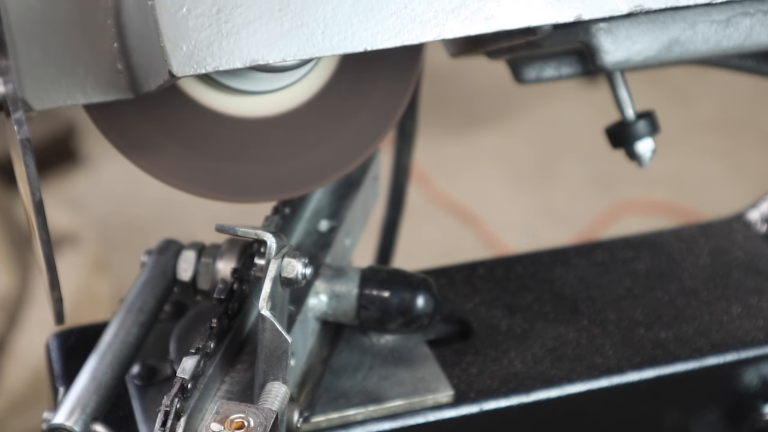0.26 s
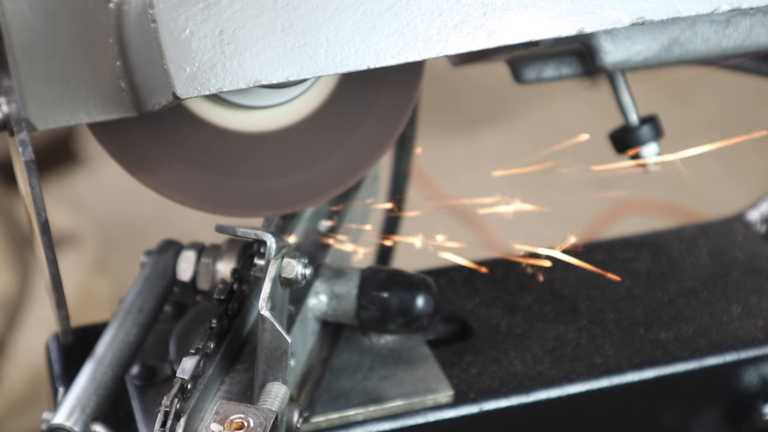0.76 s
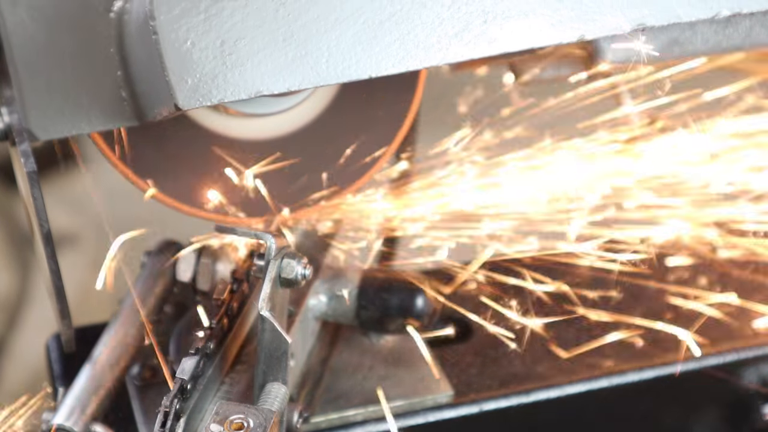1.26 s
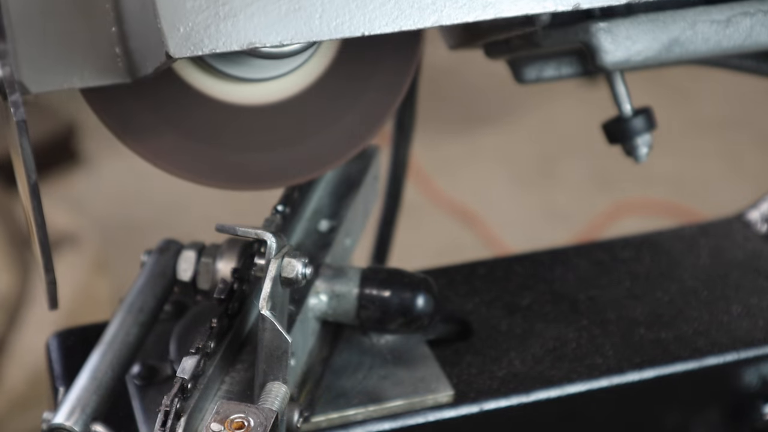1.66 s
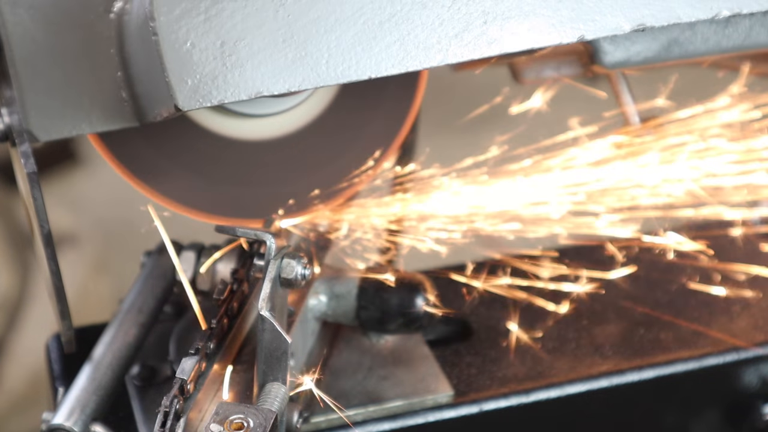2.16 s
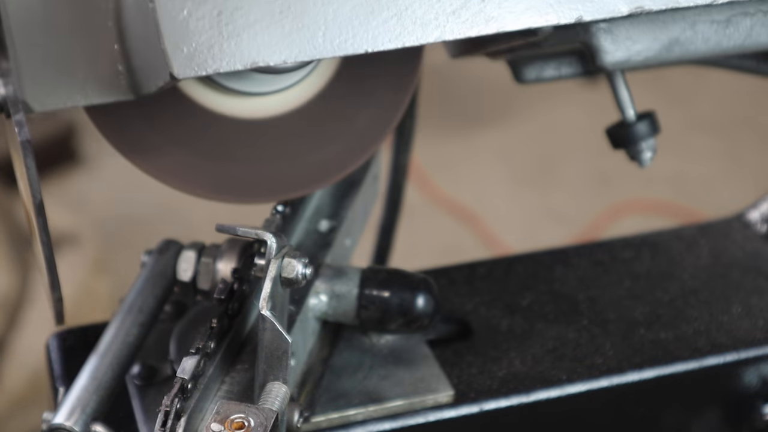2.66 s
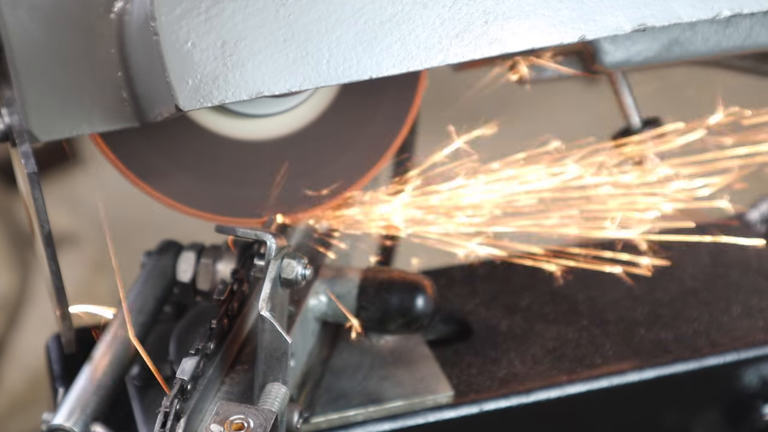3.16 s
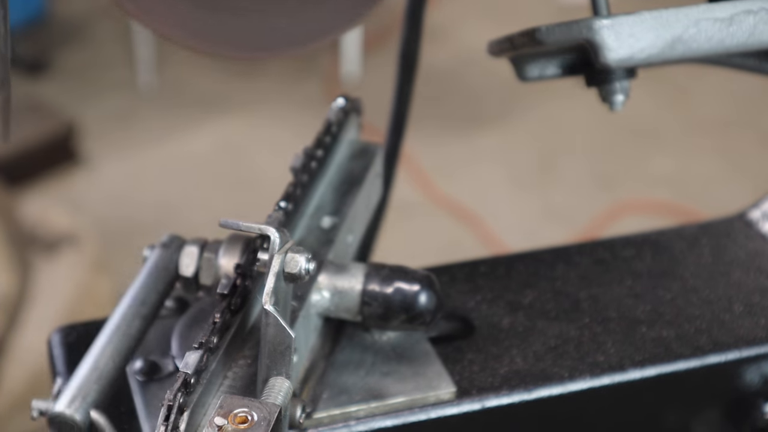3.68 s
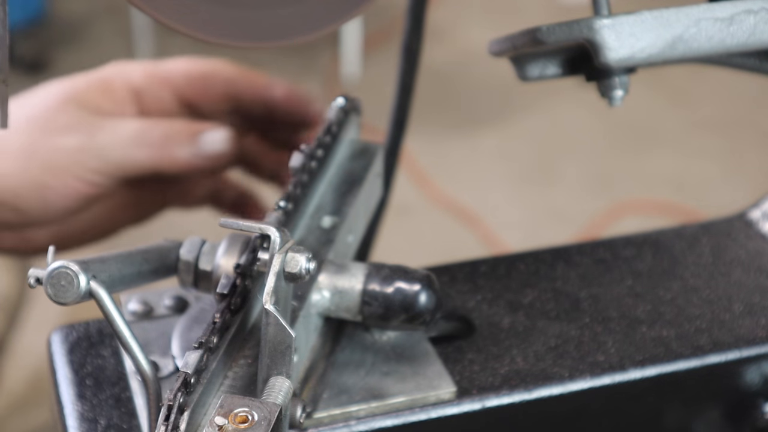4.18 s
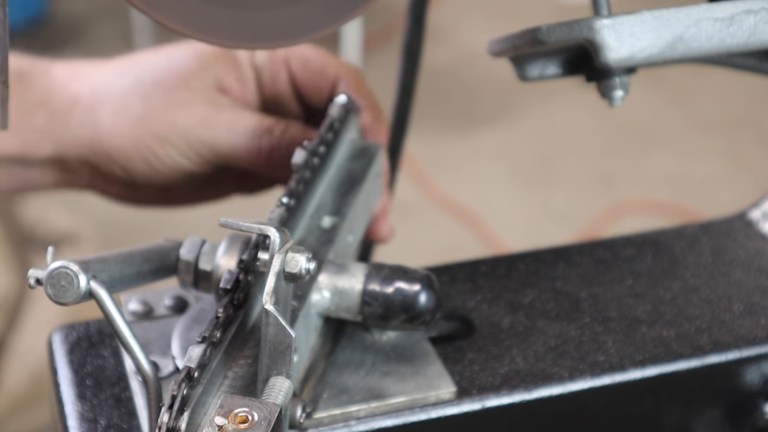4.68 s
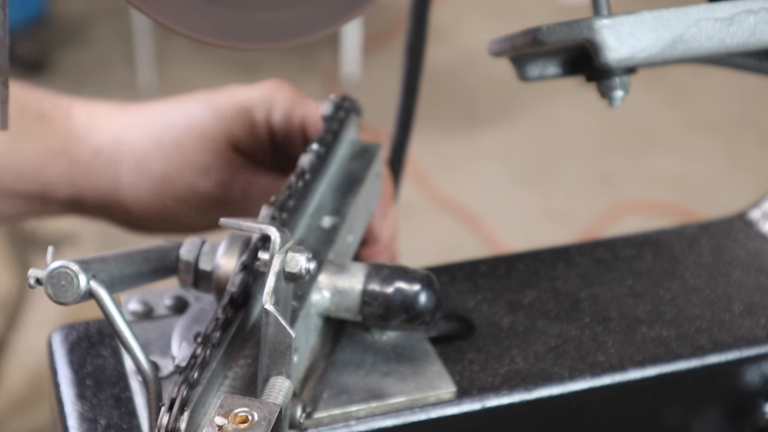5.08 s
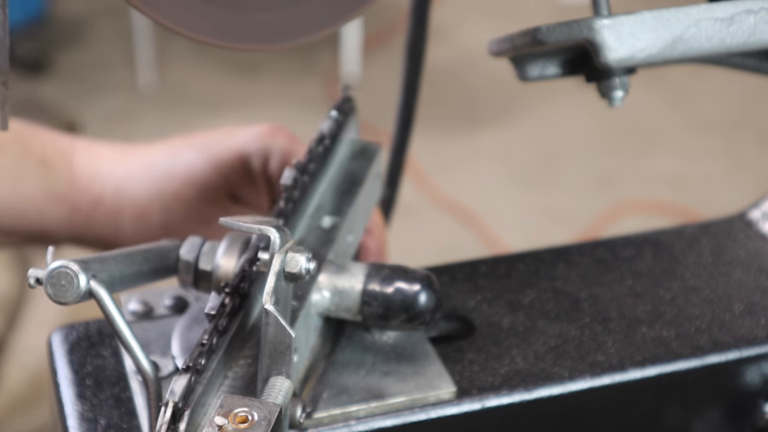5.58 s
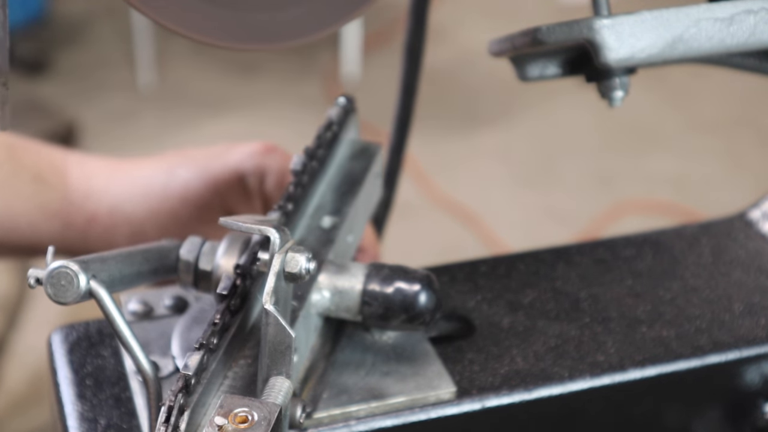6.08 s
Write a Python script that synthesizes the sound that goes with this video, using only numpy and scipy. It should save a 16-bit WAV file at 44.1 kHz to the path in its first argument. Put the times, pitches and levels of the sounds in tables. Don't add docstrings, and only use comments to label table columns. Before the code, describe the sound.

Close in a workshop, a steady throbbing electric grinder hum, broken early by three short gritty metal screeches, then only the motor running on.

```python
import sys
import numpy as np
from scipy import signal
from scipy.io import wavfile
from scipy.ndimage import uniform_filter1d

SR = 44100
rng = np.random.default_rng(int(sys.argv[2]) if len(sys.argv) > 2 else 0)


def bounce(signal):
    frames = np.transpose(np.atleast_2d(signal))
    limited = np.clip(frames, -1, 1)
    pcm = np.round(limited * 32767).astype(np.int16)
    wavfile.write(sys.argv[1], SR, pcm)


def boost_factor(decibels):
    exponent = np.asarray(decibels, float) / 20
    return 10 ** exponent


N = 279594
T = np.arange(N) / SR
HZ = np.fft.rfftfreq(8192, 1 / SR)

BELT, CAGE, BEAT, WHEEL = 11 / 56, 1 / 6, .0363, .4113
IDLE_DOWN, IDLE_UP = 133.4, 133.5

# time in seconds, how far raised [0-1].
HEAD_LIFT = [
    (0, 0),
    (1.25, 0),
    (1.7, .4),
    (2.3, .4),
    (3.1, .6),
    (3.45, .6),
    (3.9, 1),
    (6.34, 1),
]
# time in seconds, level of the grit in dB.
BITES = [
    [(.72, -55), (.76, -42), (.96, -41.5), (1.08, -33), (1.25, -32.5), (1.295, -27.5), (1.34, -28),
     (1.49, -39), (1.54, -53)],
    [(2.17, -53), (2.205, -27.5), (2.24, -31.5), (2.28, -35), (2.35, -33), (2.51, -39.5), (2.6, -56)],
    [(3.1, -53), (3.14, -36.5), (3.3, -36), (3.4, -37), (3.46, -43), (3.52, -54)],
]


def motor(turns, slowed):
    shares_db = -3.4, -10.3, -6.6
    # multiple of the shaft rate, level in dB.
    orders_down = [(1, -41), (2, -35), (3, -25), (4, -16), (5, -9), (6, -25), (7, -16), (8, -13), (9, -15),
                   (10, 0), (11, -4.5), (12, -17), (13, -21), (14, -29), (15, -19), (16, -23), (17, -23),
                   (18, -19)]
    # multiple of the shaft rate, level in dB.
    orders_up = [(1, -40), (2, -38), (3, -25), (4, -15), (5, -14), (6, -21), (7, -6.5), (8, -11.5),
                 (9, -13), (10, 0), (11, -5.5), (12, -24), (13, -16), (14, -30), (15, -22), (16, -18),
                 (17, -25), (18, -26)]
    # time in seconds, level in dB.
    wander = [(0, -15.5), (.25, -13.5), (.6, -15), (1.2, -13), (1.5, -15), (3.1, -14), (3.52, -15),
              (3.75, -13.5), (5.2, -12.5), (6.34, -13.5)]
    pattern = strength(turns + 1 / 2, slowed)
    blow = knocks(turns)
    loose = rattle(turns, pattern)
    heads = []
    for raised, orders in ((False, orders_down), (True, orders_up)):
        comb = 0
        for k, db in orders:
            drive_gain = boost_factor(db) / np.sqrt(casting_power(k * 133.5, raised))
            comb = comb + drive_gain * np.cos(2 * np.pi * k * turns)
        drives = comb * (1 + 0.12 * pattern), blow * pattern, loose
        casting = casting_power(HZ, raised)
        heads.append(sum(boost_factor(db) * evened(colour(drive, casting)) for db, drive in zip(shares_db, drives)))
    raised = np.clip(curve(HEAD_LIFT), 0, 1)
    head = (1 - raised) * heads[0] + raised * heads[1]
    return boost_factor(curve(wander)) * (head + strained_arm(blow, slowed) + fan() + hum())


def knocks(turns):
    soft = 16.0
    return sum(np.cos(2 * np.pi * k * turns) / np.hypot(1, (k / soft) ** 2) for k in range(4, 30))


def strength(turns, slowed):
    throb = [(BELT, .23, -.08), (2 * BELT, .13, -.14), (CAGE, .24, .49), (2 * CAGE, .07, .3),
             (BEAT, .12, .36), (WHEEL, .14, -.15), (WHEEL - BELT, .06, -.2), (WHEEL - CAGE, .06, .37),
             (CAGE + BEAT, .06, .4)]
    depth_down, depth_up = 1.5, .75
    damped = .2
    turn = np.floor(turns)
    pattern = sum(share * np.cos(2 * np.pi * (ratio * turn + start)) for ratio, share, start in throb)
    depth = depth_down + (depth_up - depth_down) * curve(HEAD_LIFT)
    depth = depth * (1 - damped * np.minimum(slowed, 2))
    return depth * uniform_filter1d(pattern, size=40)


def rattle(turns, pattern):
    slap = (turns - .5) % 1
    burst = 1 + np.exp(-slap / 0.1)
    gate = np.maximum(1 + 0.23 * pattern, .1)
    return rng.standard_normal(N) * burst * gate * boost_factor(drift(41))


def casting_power(hz, raised):
    # frequency in Hz, width in Hz, level in dB head down, in dB head up.
    body_modes = [(116, 20, -55, -59), (363, 36, -43.5, -36), (567.5, 22.3, -14.5, -14.5),
                  (601, 22.6, -12.5, -13.5), (646.7, 58, -16, -19), (897, 74, -21, -17),
                  (1008, 102, -20, -16), (1111, 61, -17.5, -18), (1223, 165, -16.5, -15),
                  (1314, 47.6, -4, -9), (1411.4, 54, -8.5, -6), (1446, 46, -6.5, -11), (1574, 53, -18, -20),
                  (1721, 27, -17, -19), (1958, 53, -16, -18), (2114, 67, -23.5, -18.5),
                  (2386, 186, -20, -21.5), (3002, 88, -19, -21.5), (3305, 180, -33, -28.5),
                  (4080, 160, -20, -23.5), (4560, 470, -26, -26.5), (5340, 70, -28.5, -29),
                  (6000, 240, -37, -41.5), (6940, 100, -84, -49), (7640, 110, -36, -40),
                  (8230, 510, -40, -43.5), (9160, 740, -39, -47), (11500, 410, -44, -46.5),
                  (12600, 400, -46, -65), (14700, 300, -58, -64)]
    # frequency in Hz, level in dB.
    floor = [(25, -91), (300, -58), (750, -51), (1800, -27.5), (2700, -31), (5000, -35.5), (6600, -46),
             (10000, -47.5), (13000, -53.5), (13600, -60), (15600, -64)]
    column = 3 if raised else 2
    modes = [(mode[0], mode[1], mode[column]) for mode in body_modes]
    return modes_power(modes, hz) + boost_factor(read(floor, hz)) ** 2


def strained_arm(blow, slowed):
    # frequency in Hz, width in Hz, level in dB.
    arm_modes = [(265, 20, -3.5), (579, 61, 4.5), (895, 80, 0.5), (1080, 170, 0), (1250, 210, 3.5),
                 (1720, 210, -5)]
    load = np.sqrt(np.clip(2 * slowed, 0, 2))
    rough_blow = evened(blow) * (1 + .6 * drift(40))
    strain = load * (rough_blow + 2.2 * rng.standard_normal(N))
    return boost_factor(-17) * evened(colour(strain, modes_power(arm_modes, HZ)))


def grinding(turns):
    # frequency in Hz, level in dB per Hz.
    grit = [(1180, -33), (2000, 2.5), (2770, -7), (2940, -1.5), (4250, -4.5), (4880, -6), (5270, -7),
            (10800, -17.5), (15500, -32)]
    # frequency in Hz, width in Hz, level in dB.
    chain_modes = [(2407, 23, -8), (3146, 41, 2), (3170, 36, 1), (4035, 230, 4), (4460, 170, 6),
                   (5320, 170, -4.5), (5940, 210, -24), (6410, 200, -12), (7620, 260, -21),
                   (8620, 370, -13), (9300, 300, -13), (10500, 500, -15), (11600, 290, -12)]
    wobble_db, chatter_db = 3, 2.0
    hiss_db, ring_db = 6, 2
    grains = rng.standard_normal(N) * boost_factor(2.5 * np.minimum(rng.exponential(1, N), 4))
    grains *= boost_factor(wobble_db * np.cos(2 * np.pi * WHEEL * turns))
    low_cut = (HZ / (HZ + 900)) ** 4
    hiss = colour(grains, boost_factor(read(grit, HZ)) ** 2 * low_cut)
    ring = 0
    for mode in chain_modes:
        chatter = boost_factor(chatter_db * drift(17))
        ring = ring + colour(grains * chatter, modes_power([mode], HZ))
    contact = sum(map(pressure, BITES))
    return contact * (boost_factor(hiss_db) * evened(hiss) + boost_factor(ring_db) * evened(ring))


def pressure(bite):
    return boost_factor(curve(bite)) * (T > bite[0][0]) * (T < bite[-1][0])


def sag():
    turns_lost = 1.42, .73, .32
    grip_db, inertia_s, drag_power = -44, .04, 1.2
    hold = np.exp(-1 / (inertia_s * SR))
    slowed = 0
    for lost, bite in zip(turns_lost, BITES):
        grip = np.maximum(pressure(bite) - boost_factor(grip_db), 0) ** drag_power
        drag = signal.lfilter([1 - hold], [1, -hold], grip)
        slowed = slowed + lost * SR * drag / (drag.sum() + 1e-9)
    return slowed


def fan():
    # frequency in Hz, level in dB.
    air_colour = [(25, -16), (70, -10), (200, -2), (330, -0.5), (480, 1.5), (750, 1), (1200, -20),
                  (20000, -55)]
    air = rng.standard_normal(N)
    return boost_factor(-27) * evened(colour(air, boost_factor(read(air_colour, HZ)) ** 2))


def hum():
    return boost_factor(-43.5) * np.sin(2 * np.pi * 120 * T)


def shop(x):
    t60, wet_db = 0.074, -9
    taps = np.zeros(SR // 2)
    at = np.arange(400, len(taps) - 20, 20)
    taps[at + rng.integers(0, 20, len(at))] = rng.choice([-1., 1.], len(at))
    taps *= boost_factor(-60 * T[:len(taps)] / t60)
    return x + boost_factor(wet_db) * signal.fftconvolve(x, taps / np.linalg.norm(taps))[:N]


def evened(x):
    return x / np.sqrt(np.mean(x ** 2) + 1e-20)


def curve(rows):
    seconds, value = np.transpose(rows)
    return np.interp(T, seconds, value)


def read(points, hz):
    f, value = np.transpose(points)
    return np.interp(np.log(hz + 1), np.log(f + 1), value)


def modes_power(modes, hz):
    return sum(boost_factor(db) ** 2 / (1 + (2 * (hz - f) / width) ** 2) ** 2 for f, width, db in modes)


def colour(x, power):
    log_gain = np.log(power + 1e-12) / 2
    circle = signal.hilbert(np.r_[log_gain, log_gain[-2:0:-1]])
    response = np.fft.ifft(np.exp(np.conj(circle))).real[:4096]
    return signal.oaconvolve(x, response)[:N]


def drift(hz):
    return evened(signal.lfilter(*signal.butter(2, hz, fs=SR), rng.standard_normal(N)))


def scene():
    slowed = sag()
    speed = IDLE_DOWN + (IDLE_UP - IDLE_DOWN) * curve(HEAD_LIFT) - slowed
    turns = np.cumsum(speed) / SR + .26
    return (motor(turns, slowed) + shop(grinding(turns)))[None]


def roll_off(x):
    return signal.sosfilt(signal.butter(12, 15690, fs=SR, output="sos"), x)


def record(dry):
    ceiling = 1.1
    mix = ceiling * np.tanh(dry / ceiling)
    return roll_off(mix)


dry = scene()
out = record(dry)
bounce(out)
```